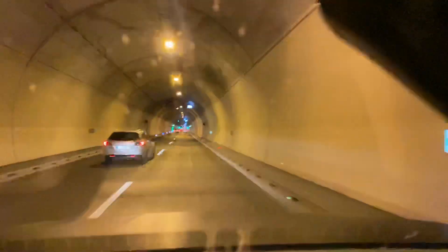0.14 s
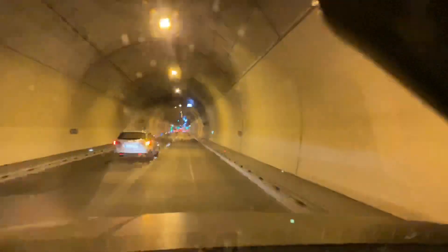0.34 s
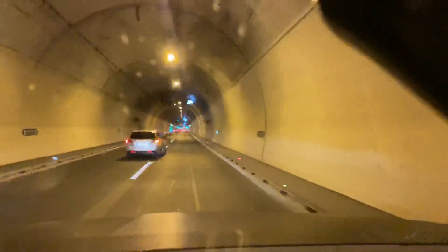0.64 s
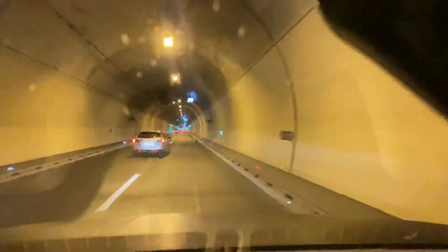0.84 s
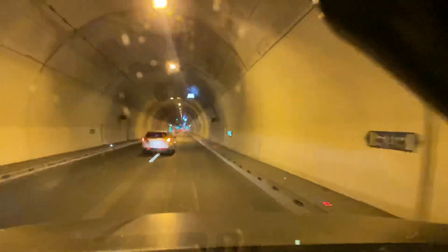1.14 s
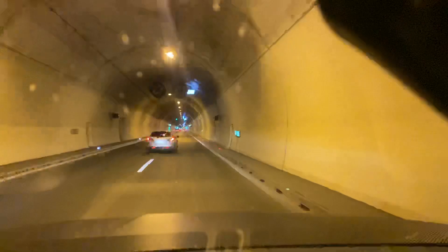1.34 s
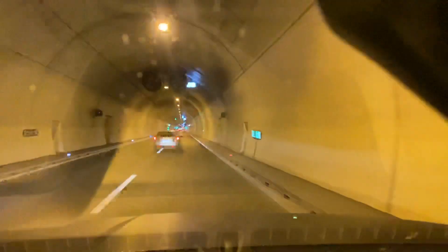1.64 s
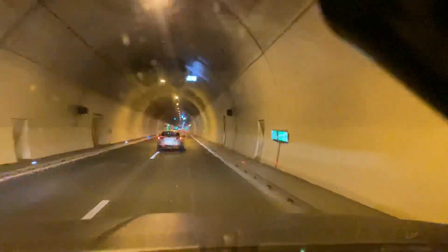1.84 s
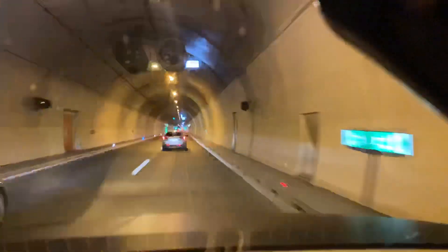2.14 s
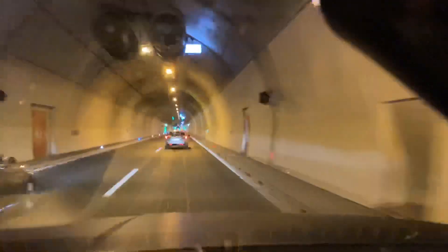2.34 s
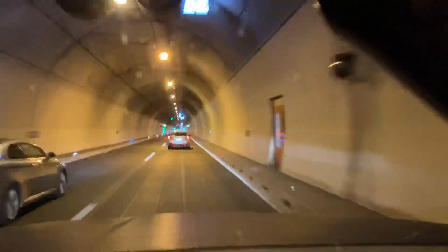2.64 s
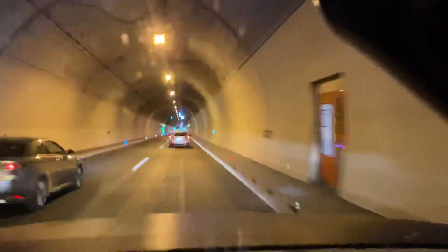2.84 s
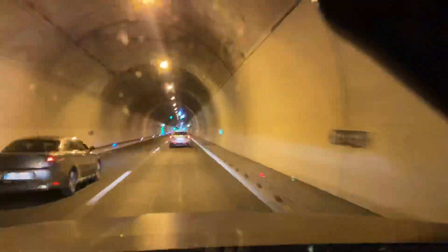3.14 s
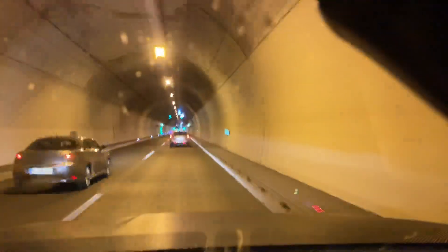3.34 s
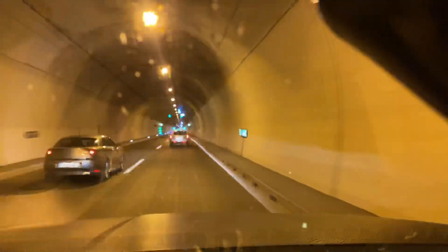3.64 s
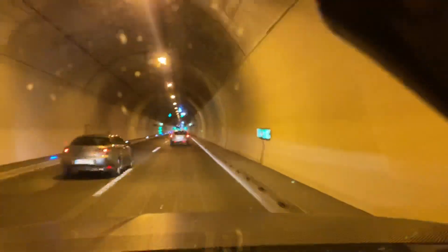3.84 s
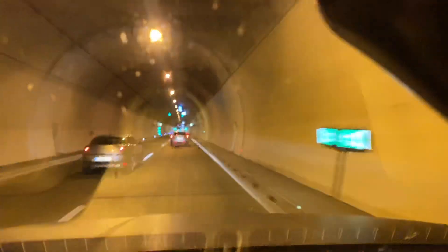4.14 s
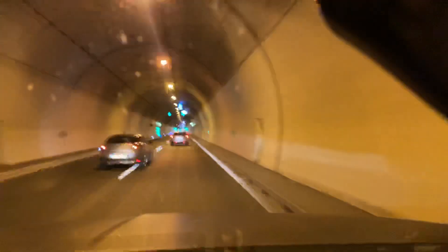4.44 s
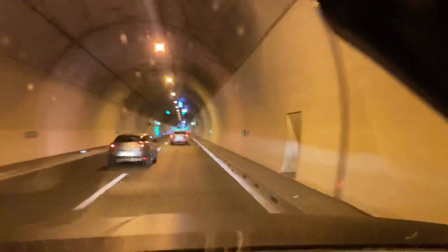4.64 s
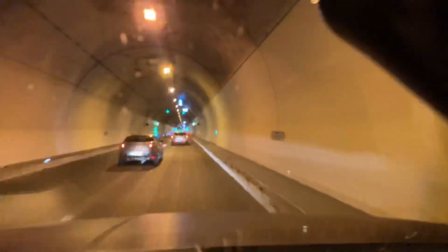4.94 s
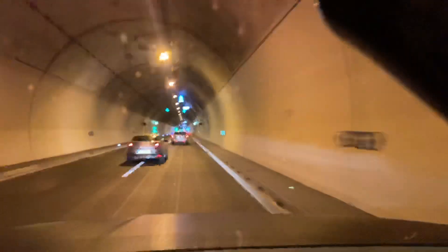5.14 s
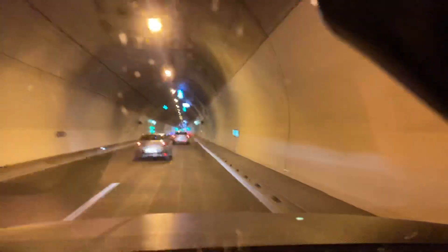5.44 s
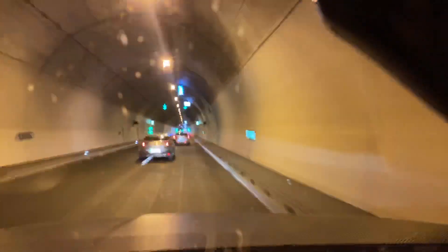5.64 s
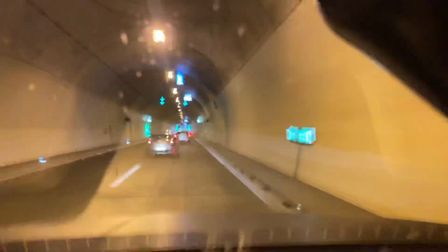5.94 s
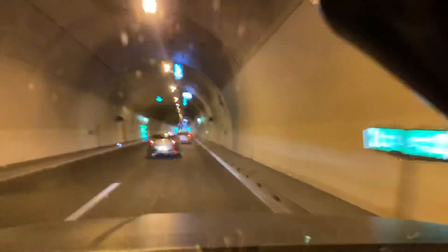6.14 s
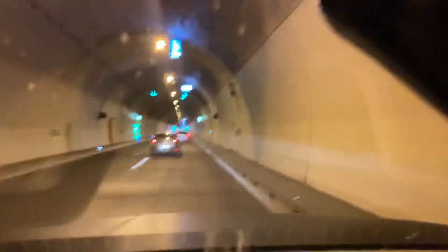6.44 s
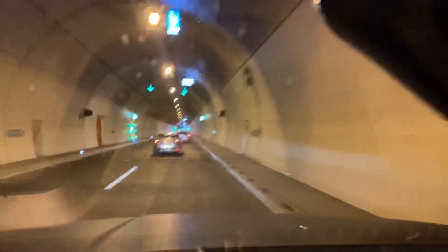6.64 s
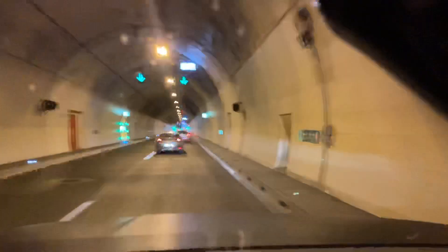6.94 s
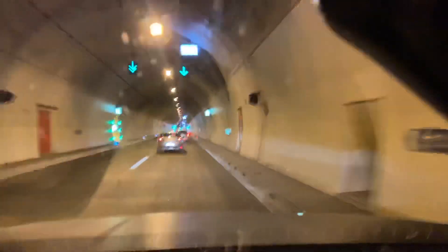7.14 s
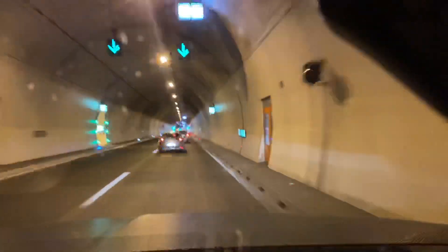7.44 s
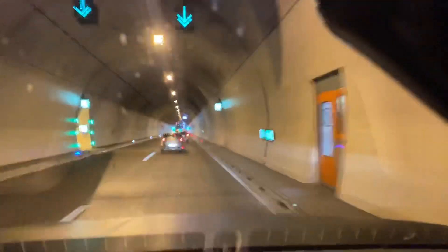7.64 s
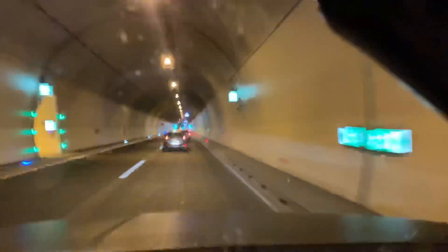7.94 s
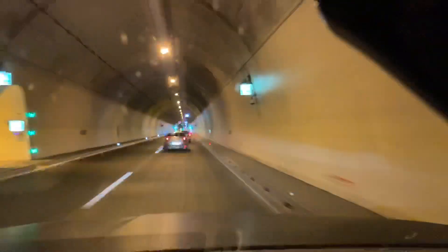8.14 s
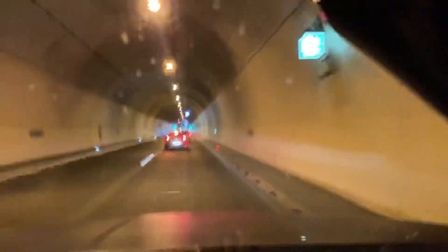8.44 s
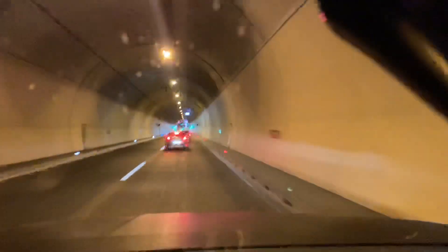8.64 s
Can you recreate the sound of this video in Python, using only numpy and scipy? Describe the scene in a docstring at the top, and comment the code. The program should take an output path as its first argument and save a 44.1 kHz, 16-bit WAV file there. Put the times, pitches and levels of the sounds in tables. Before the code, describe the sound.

Inside a small car cruising through a road tunnel, the engine drones and slowly sinks in pitch over steady tyre rumble and rushing air.

```python
"""The engine of a small car leads, heard from inside the cabin in a road tunnel. As it slowly loses revs its
overtones, drifting tones at multiples of the firing rate, slide through the cabin's resonances, and its
firing note booms and throbs more. Tyre rumble, roar, cabin ring and air are shaped noise whose level
follows the road. A sizzle, a few airy swishes and faint ticks pass; two microphone ports hear it all."""
import sys
import numpy as np
from scipy import signal
from scipy.fft import rfft, irfft, next_fast_len
from scipy.io import wavfile
from scipy.ndimage import uniform_filter1d, map_coordinates

SR = 44100
rng = np.random.default_rng(int(sys.argv[2]) if len(sys.argv) > 2 else 0)


def generate_wav(sig):
    """Save sig (samples, or channels by samples) to the path in sys.argv[1] as 16-bit PCM at SR."""
    pcm = np.round(np.clip(np.atleast_2d(sig).T, -1, 1) * 32767).astype(np.int16)
    wavfile.write(sys.argv[1], SR, pcm)


N = 388521

# the two ports in the cabin's sound field: f/Hz, likeness/0-1, left lead/rad, left over right/dB
PORT_FIELD = [(40, .96, 0, -1.6), (90, .72, .1, .3), (135, .9, .62, -.1), (190, .45, 1.25, 3.5),
              (260, .62, .6, 1.8), (360, .7, 2.2, .3), (500, .55, 2.3, .9), (640, .82, 2.75, 1.6),
              (900, .9, 3, 1.5), (1140, .82, 2.9, 2), (1350, .32, 2.4, 3), (2050, .2, 2.3, 2),
              (2700, .2, .8, 1.8), (5000, .32, .8, 1.5), (6500, .42, -.6, 0), (8500, .45, 2.6, -1),
              (10500, .3, 1, 0)]


def engine():
    """Firing note, body shudder, and overtones that swell as they cross the cabin's resonances."""
    # engine speed: t/s, firing rate/Hz
    revs = [(0, 159.7), (.6, 157.2), (1.3, 154.6), (2.8, 149.3), (3.9, 139.4), (4.9, 131.7), (6.2, 128.9),
            (7.7, 126.6), (8.81, 127.4)]
    # engine load, which drives the overtones: t/s, level/dB
    load = [(0, 6), (.5, 4), (1.1, 2), (1.6, -0.5), (2, 1), (2.5, 0), (3.1, 2), (4.2, 3.5), (5.4, -1.5),
            (6, -8), (7.6, 1), (8.81, 0)]
    # overtones before load and cabin: multiple of the firing rate, level/dB, roughness/0-1, drift rate/Hz
    overtone_rows = [(1.5, -41, 0.9, 30), (2, -42.5, 0.9, 45), (2.75, -32.5, 1, 75), (3, -27, .84, 50),
                     (4, -29.8, 0.62, 30), (4.5, -32, 1, 45)]
    # cabin resonances that lift the overtones: f/Hz, width/Hz, level/dB
    cabin = [(215, 30, -2), (285, 38, -2), (448, 60, 0), (570, 28, 1)]
    firing, = curves(revs)
    load_db, = curves(load)
    overtones = 0
    for multiple, db, rough, rate_hz in overtone_rows:
        tone = order_tone(multiple * firing, rough, port_drift(rate_hz))
        overtones = overtones + amp(db) * tone
    hum = filtered(amp(load_db) * overtones, lambda hz: resonances(cabin, hz))
    return firing_note(firing) + body_shudder(firing) + hum


def firing_note(firing):
    """The main engine note and the drone that beats with it: they swell and sag."""
    # the note's clearest swells and sags: t/s, change/dB
    throbs = [(.76, -8), (.84, 4), (1.01, 8.5), (1.15, 8), (1.28, 10.5), (1.39, 10.5), (1.6, -9), (1.75, 9),
              (1.95, 8), (2.06, 4.5), (2.27, -1), (2.63, -20), (2.76, 10), (2.99, 9), (3.14, -3), (3.26, 8),
              (3.36, -4), (3.49, 7), (3.57, -10), (3.79, 12), (3.88, 9.5), (4.01, 7), (4.13, -8), (4.33, 4),
              (4.48, 4), (4.66, -3), (4.75, 4), (4.88, 8), (5.03, 8), (5.14, -1), (5.22, 7.5), (5.33, 5.5),
              (5.46, 6), (5.56, 9), (5.64, -6), (5.75, 8), (5.85, 3), (5.95, 3), (6.05, 6), (6.12, -12),
              (6.21, 8), (6.29, -4), (6.36, 4), (6.44, 3), (6.59, -3), (6.73, 7.3), (6.8, -9), (6.93, -2),
              (7.02, 6.5), (7.16, -11), (7.27, 4), (7.38, 2), (7.49, 4), (7.63, 8.7), (7.81, -2), (7.93, 5),
              (8.04, 2), (8.16, 6), (8.46, -7), (8.64, -3), (8.76, -4)]
    # pitch bends of the note at low revs: t/s, bend/Hz
    bends = [(5.25, -2), (5.95, -4), (6.3, 2), (6.74, -2), (6.98, 7), (7.25, 3), (7.47, 6), (7.63, -3),
             (8.08, -3), (8.5, 4)]
    lift_db = swells(throbs, length_s=0.079)
    # chance throbbing and roughness give way during a strong swell
    calm = amp(-np.maximum(lift_db, 0))
    throb_db, throb_rate = 1.4, 14  # depth (dB) and pace (knots per s) before calming
    chance_db = throb_db * np.minimum(wobble(throb_rate), 1) * calm
    # uneven firing roughens the note round its mean strength
    drift = flutter(rate_hz=32)
    mean_power = uniform_filter1d(np.abs(drift) ** 2, size=SR // 8)
    drift = drift / np.sqrt(np.abs(mean_power) + 1e-6)
    note_hz = firing * (1 + 0.01099 * wobble(7.6)) + swells(bends, length_s=0.15)
    note_gain = boom(firing, db=-22, reach_hz=15.1) * amp(lift_db + chance_db)
    note = note_gain * order_tone(note_hz, 0.078 * calm, drift)
    # the drone sits just above the note and follows its swells at half depth in dB
    beat_gain = boom(firing, db=-24.5, reach_hz=7.5) * amp(.5 * lift_db)
    beat = beat_gain * order_tone(firing * 1.08, 0.68, flutter(rate_hz=34))
    return note + beat


def body_shudder(firing):
    """The body's lowest shudder: a fixed low pitch that strengthens as the revs sink."""
    # swells and sags of the shudder: t/s, change/dB
    shudders = [(.39, 8), (.83, -8), (2.15, 5), (2.5, 6), (3.8, 8), (4.3, -11), (5.05, -5), (5.3, 4),
                (5.62, 6), (6, 6.5), (6.38, 6), (6.8, 7.5), (7.02, -6), (7.66, 10), (7.9, 9), (8.76, 7)]
    shake_hz = 64.4
    gain = boom(firing, db=-30.5, reach_hz=17) * amp(swells(shudders, length_s=.2))
    return gain * order_tone(np.full(N, shake_hz), 0.14, flutter(rate_hz=10))


def boom(firing, db, reach_hz):
    """Gain of a low drone: full at low revs, halved for each reach_hz that the firing rate climbs."""
    full_boom_hz = 130  # firing rate at or below which the body booms fully
    return amp(db) * .5 ** (np.maximum(firing - full_boom_hz, 0) / reach_hz)


def order_tone(hz, rough, drift):
    """One tone at both ports: a clean line blended with a drifting one."""
    rough = np.clip(rough, 0, 1)
    line = np.exp(2j * np.pi * np.cumsum(hz) / SR)
    tone = line * (np.sqrt(1 - rough) + np.sqrt(rough) * drift)
    return np.real(tone * ports(hz))


def flutter(rate_hz):
    """Random drift of strength and phase that widens a line."""
    return unit(wobble(rate_hz) + 1j * wobble(rate_hz))


def port_drift(rate_hz):
    """Drift of an overtone, partly shared and partly separate at the two ports."""
    separate = np.array([flutter(rate_hz), flutter(rate_hz)])
    return unit(flutter(rate_hz) + 0.68 * separate)


def swells(rows, length_s):
    """Sum of bell-shaped rises and dips (t/s, change), each length_s wide where it falls to 1/e."""
    t = np.arange(N) / SR
    return sum(change * np.exp(-(2 * (t - s) / length_s) ** 2) for s, change in rows)


def road():
    """Suspension rumble, tyre roar, cabin ring and air on the body: noises that follow the road."""
    # the road passing under the car: t/s, rumble level/dB, hiss level/dB
    surface = [(0, -1.5, -0.7), (.8, -1.5, 0.9), (1.8, -2.5, -1.5), (3.1, -3, 0.5), (4.3, -2.5, -0.5),
               (5.8, -1.6, 1), (7.1, 0.1, 0), (8.81, -1, -0.1)]
    # noise spectra before the road's level: f/Hz, level/dB per Hz
    # rumble through the suspension
    rumble_spectrum = [(8, -100), (20, -68), (38, -44.5), (47, -54), (57, -40), (69, -42.5), (82, -53.5),
                       (112, -45), (138, -46.5), (175, -47.5), (212, -51.5), (255, -54.5), (300, -55.5),
                       (700, -150)]
    # tyre roar
    roar_spectrum = [(100, -130), (335, -58.5), (450, -55.8), (530, -55.3), (660, -56.6), (780, -57),
                     (940, -58.2), (1015, -60.5), (1140, -57.6), (1280, -61.2), (1500, -63.3),
                     (1750, -67.5), (1960, -69.4), (2400, -77), (5000, -140)]
    # air round the body
    air_spectrum = [(1500, -100), (2400, -76.6), (2850, -76.2), (3400, -79.2), (3650, -79.5), (4400, -84.4),
                    (5150, -85.8), (5500, -90), (5850, -88.6), (6400, -89.1), (7500, -93.9), (8700, -98),
                    (10300, -99.7), (12000, -104.8), (13200, -125)]
    rumble_db, hiss_db = curves(surface)
    rumble = amp(rumble_db) * field(lambda hz: amp(along(rumble_spectrum, hz)[0]))
    roar_db = 0.72 + hiss_db + 0.15 * wobble(14)
    roar = amp(roar_db) * field(lambda hz: amp(along(roar_spectrum, hz)[0]))
    # the road surface drives the cabin's modes unevenly
    tread_db = 2.2 + 0.82 * rumble_db + 1.4 * wobble(11)
    tread = amp(tread_db) * rng.standard_normal(N) * np.sqrt(SR / 2)
    # the left port hears the ring slightly louder
    ring = amp([[.6], [-.6]]) * filtered(tread, cabin_ring)
    air_db = hiss_db + 0.28 * wobble(8)
    air = amp(air_db) * field(lambda hz: amp(along(air_spectrum, hz)[0]))
    return rumble + ring + patchy(roar + air, depth_db=1.3)


def cabin_ring(hz):
    """Complex gain of the tyre-driven cabin modes, each with a phase lead between the ports."""
    # cabin modes before tread and port levels: f/Hz, width/Hz, level/dB per Hz, left lead/rad
    cabin_modes = [(445, 50, -58, 2), (575, 28, -56.5, 1.1), (615, 38, -52.5, 3.1), (712, 45, -56.3, 2.6),
                   (775, 55, -67.5, 0), (865, 50, -52.8, 3.1), (946, 40, -53.3, 3.1), (1025, 40, -66, 0),
                   (1075, 45, -57.5, 2.8), (1265, 60, -63, .2), (1385, 70, -63.5, 2.9),
                   (1620, 55, -66.5, 1.3), (1710, 50, -68, 3.1), (1865, 70, -72.3, .2),
                   (2115, 75, -69.5, .5), (2235, 55, -72, 1.7), (2490, 90, -79.5, .6)]
    sides = np.array([[.5j], [-.5j]])
    return sum(resonances([mode[:3]], hz) * np.exp(sides * mode[3]) for mode in cabin_modes)


def patchy(x, depth_db):
    """Turbulence: the bands of a rushing noise flutter by smoothed random gains."""
    z = signal.stft(x, nperseg=256)[2]
    gain = rng.standard_normal(z.shape[1:])
    gain = uniform_filter1d(gain, size=4, axis=0)  # across bands
    gain = uniform_filter1d(gain, size=10, axis=1)  # along time
    fluttered = z * unit(amp(depth_db * unit(gain)))
    return signal.istft(fluttered, nperseg=256)[1][:, :N]


def hisses():
    """Resonant noise: an early high sizzle, then a few swishes that rise quickly and fade slowly."""
    # airy swishes: t/s, level/dB per Hz before the resonances, top resonance f/Hz
    swishes = [(6.24, -76, 3400), (6.78, -82, 3400), (7.1, -72.6, 3650), (7.57, -71.6, 3450)]
    # resonances that colour all swishes: f/Hz, width/Hz, level/dB
    swish_peaks = [(2260, 150, 1), (2850, 560, -5)]
    t = np.arange(N) / SR
    peak_s, peak_db = 0.8, -92  # the sizzle's loudest moment and its level (dB per Hz) before flicker
    rise_db_per_s, fade_db_per_s = 12, 18
    sizzle_db = peak_db - np.maximum(rise_db_per_s * (peak_s - t), fade_db_per_s * (t - peak_s))
    sizzle_noise = field(lambda hz: resonances([(10600, 2100, 0)], hz))
    out = amp(sizzle_db + 1.4 * wobble(25)) * sizzle_noise
    swish_rise_s, swish_fade_db_per_s = 0.04, 21
    for s, db, top_hz in swishes:
        rise = np.clip(1 + (t - s) / swish_rise_s, 0, 1)
        fade = amp(db - swish_fade_db_per_s * np.maximum(t - s, 0))
        peaks = swish_peaks + [(top_hz, 480, -2.5)]  # f/Hz, width/Hz, level/dB
        noise = field(lambda hz: resonances(peaks, hz))
        out = out + rise * fade * amp(0.91 * wobble(10)) * noise
    return out


def trim():
    """Tiny bright ticks of plastic: resonant noise that starts at once and dies in milliseconds."""
    # faint ticks of the trim: t/s, relative level/dB
    ticks = [(2.952, -52), (6.224, -42), (6.230, -48), (6.269, -46.5)]
    t = np.arange(N) / SR
    # each tick loses 60 dB in 16 ms
    strikes = sum((t >= s) * amp(db - 60 * np.abs(t - s) / .016) for s, db in ticks)
    plastic = unit(field(lambda hz: resonances([(3500, 700, 2), (11200, 2200, 0)], hz)))
    return .5 * strikes * plastic


def field(colour):
    """Cabin noise of a given gain per root Hz, partly shared by the two ports."""
    m = next_fast_len(N + SR // 4)
    hz = np.fft.rfftfreq(m, 1 / SR)
    # close reflections off glass and trim comb the mids and highs, here as a random ripple
    ripple = np.interp(hz, np.linspace(0, SR / 2, num=700), rng.standard_normal(700))
    comb_db = 1.3 * ripple * hz / (hz + 500)
    a, b = rfft(rng.standard_normal((2, m))) * np.sqrt(SR / 2) * amp(comb_db)
    # the more alike the ports, the more of the noise they share
    likeness = np.clip(along(PORT_FIELD, hz)[0], 0, 1)
    turn = np.arccos(likeness) / 2
    shared, own = np.cos(turn) * a, np.sin(turn) * b
    pair = np.array([shared + own, shared - own])
    return irfft(pair * ports(hz) * colour(hz), m)[:, :N]


def ports(hz):
    """Complex gain of the left and the right port: their phase lead and level tilt at each frequency."""
    _, lead, tilt_db = along(PORT_FIELD, hz)
    left, right = amp(tilt_db / 2), amp(-tilt_db / 2)
    pair = np.array([left * np.exp(.5j * lead), right * np.exp(-.5j * lead)])
    return pair / np.sqrt((left ** 2 + right ** 2) / 2)


def resonances(modes, hz):
    """Summed gain of resonances (f/Hz, width/Hz, level/dB), each down to a third one width off centre."""
    return sum(amp(db) / (1 + ((hz - centre) / width) ** 2 * 2) for centre, width, db in modes)


def filtered(x, response):
    """x shaped by a response given as a function of frequency."""
    m = next_fast_len(N + SR // 4)
    return irfft(rfft(x, m) * response(np.fft.rfftfreq(m, 1 / SR)), m)[..., :N]


def wobble(rate):
    """A smooth random curve of rms 1, rate knots a second."""
    knots = rng.standard_normal(2000)
    return unit(map_coordinates(knots, [np.arange(N) * rate / SR], mode="mirror"))


def curves(rows):
    """One value per sample for each column after the time."""
    s, *cols = np.transpose(rows)
    return [np.interp(np.arange(N) / SR, s, c) for c in cols]


def along(points, hz):
    """Each column after the frequency, read on a log axis."""
    f, *cols = np.transpose(points)
    return [np.interp(np.log(hz + 1), np.log(f + 1), c) for c in cols]


def unit(x):
    """Scale to rms 1."""
    return x / np.sqrt(np.mean(np.abs(x) ** 2) + 1e-20)


def amp(db):
    """Decibels to gain."""
    return 10 ** (np.asarray(db) / 20)


def scene():
    """Everything heard from the front seat."""
    return engine() + road() + hisses() + trim()


def record(dry):
    """The recorder keeps nothing above its band limit."""
    top_hz = 15200
    return filtered(dry, lambda hz: hz < top_hz)


dry = scene()
out = record(dry)
generate_wav(out)
```